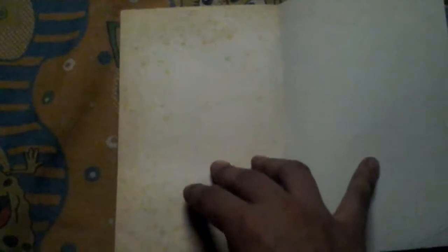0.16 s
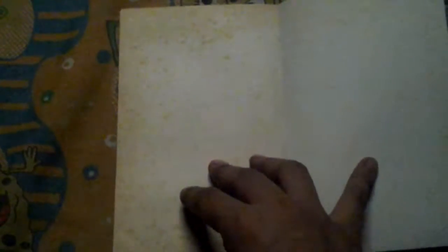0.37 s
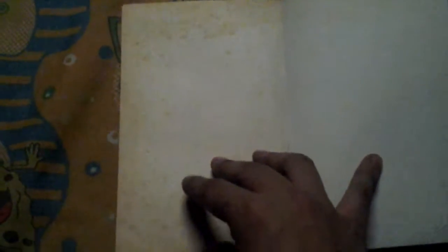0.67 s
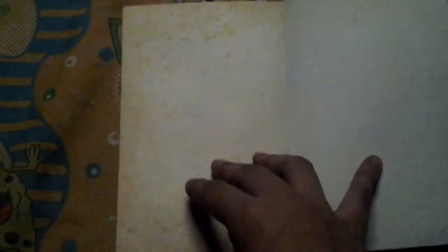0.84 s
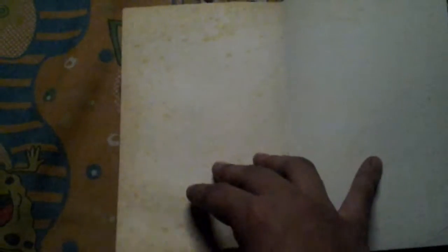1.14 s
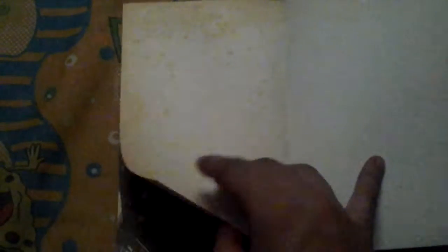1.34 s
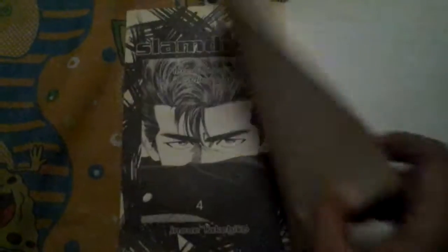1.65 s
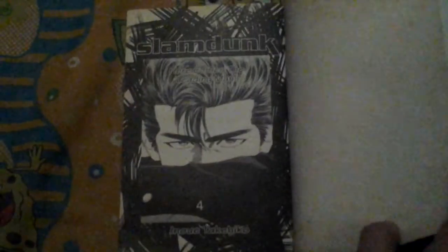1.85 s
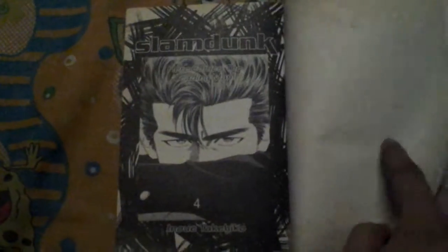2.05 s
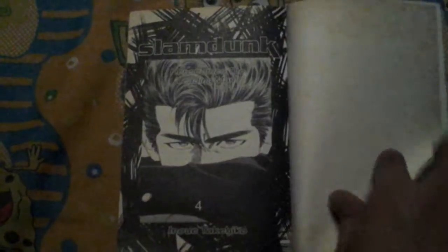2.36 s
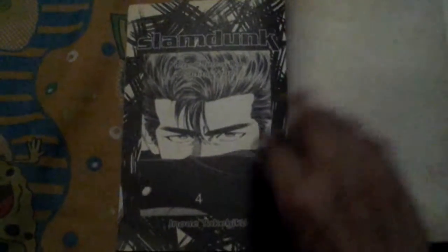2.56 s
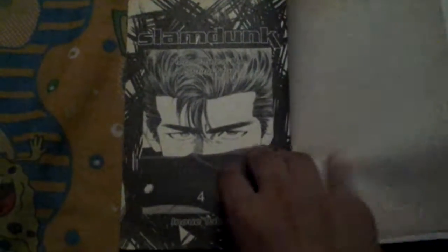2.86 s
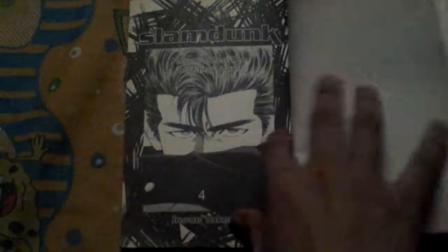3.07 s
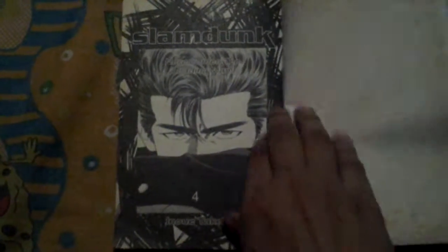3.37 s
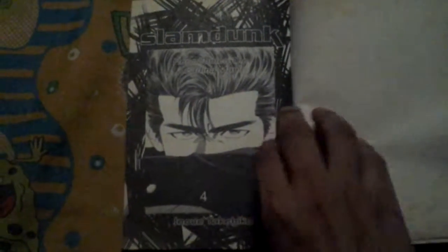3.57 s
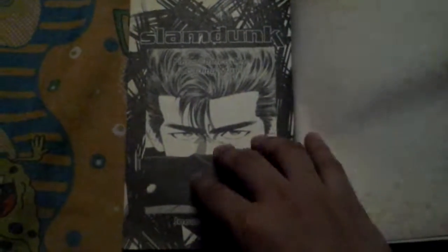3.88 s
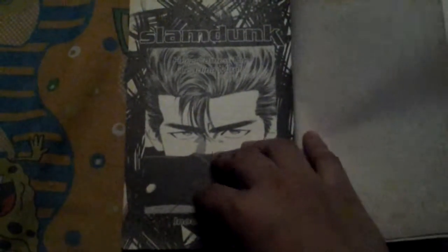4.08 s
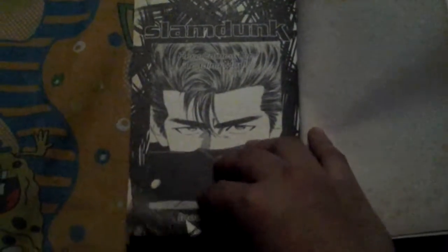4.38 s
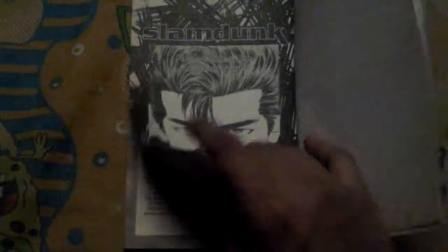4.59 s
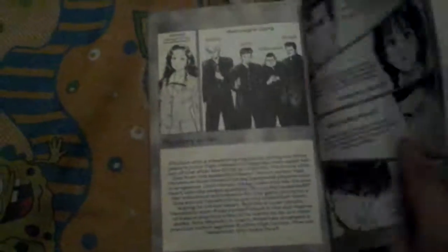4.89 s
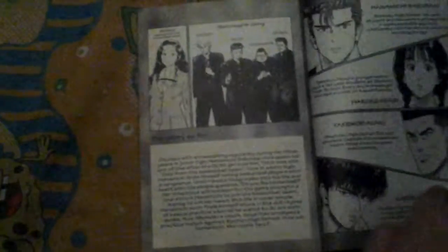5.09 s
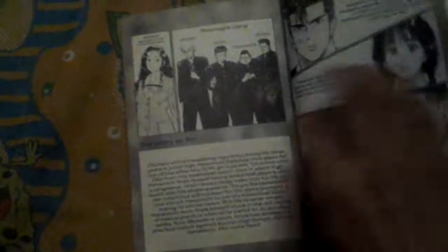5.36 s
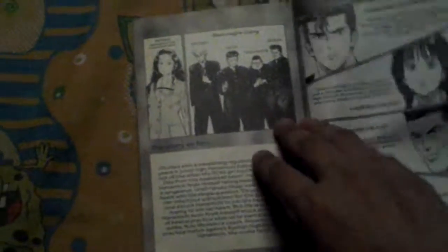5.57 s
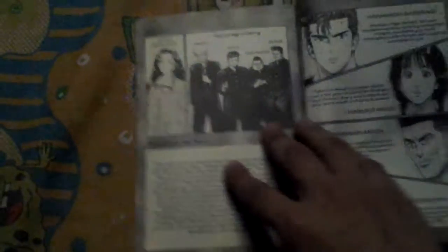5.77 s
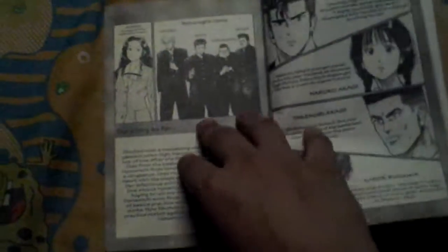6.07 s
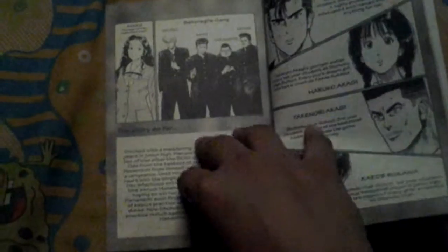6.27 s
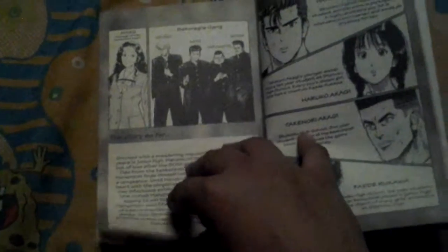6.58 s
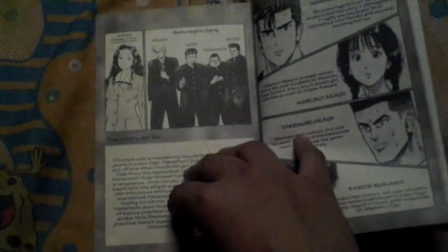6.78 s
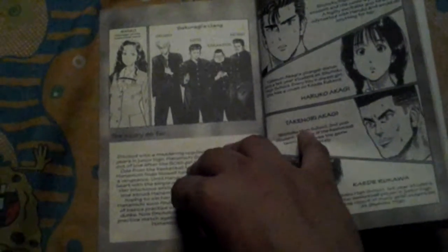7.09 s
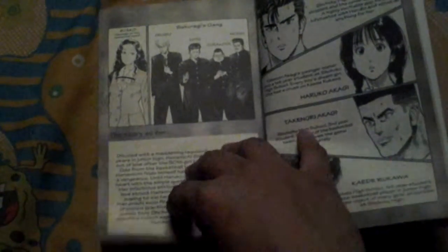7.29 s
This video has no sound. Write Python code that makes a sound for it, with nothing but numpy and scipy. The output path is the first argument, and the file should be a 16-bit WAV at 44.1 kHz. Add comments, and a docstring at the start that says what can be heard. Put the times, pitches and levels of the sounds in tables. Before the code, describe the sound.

Close, papery double slaps run steadily, then stop; a fingertip tap, a swish of page, a crisp snap and dull hand bumps follow over steady hiss.

```python
"""In a hissing room, close to a small microphone, dry paper flicks come about five a second for three seconds.
Each flick slides in, slaps twice and is followed by a soft return stroke: friction noise and crackle
under contact envelopes, partly filtered by the resonances of a hollow body.
Then a hand turns a paperback page and smooths it: faint rustle, air, snaps (one sharp), taps, dull bumps.
Behind lie filtered-noise rush, hiss and rumble, and a faint hum of wavering sines."""
import sys
import numpy as np
from scipy import signal
from scipy.fft import rfft, irfft
from scipy.io import wavfile
from scipy.ndimage import uniform_filter1d

SR = 44100
rng = np.random.default_rng(int(sys.argv[2]) if len(sys.argv) > 2 else 0)


def wav_record(signal):
    """Record a signal, one row per channel, as 16-bit PCM in the file named by sys.argv[1]."""
    frames = np.transpose(np.atleast_2d(signal))
    bounded = np.clip(frames, -1, 1)
    # unit amplitude maps onto the largest positive 16-bit level
    quanta = np.round(bounded * 32767).astype(np.int16)
    wavfile.write(sys.argv[1], SR, quanta)


N = 328104  # samples

# All levels are relative: later gains, filters and normalisation also act on them.

# resonances of the struck body: f/Hz, bandwidth/Hz, level/dB
BODY_MODES = [(340, 21, -2.5), (617, 93, -3), (930, 37, -12.5), (1276, 41, -0.5), (1979, 73, -5.5),
              (2320, 25, -8.5), (2833, 21, -11.5), (3010, 30, -11), (3190, 64, -10.5), (3525, 41, -6),
              (4200, 19, -11.5)]
# spectrum of the first, full knock: f/Hz, level/dB per Hz
KNOCK_SPECTRUM = [(150, -29), (320, 3.5), (650, -3.5), (900, 0), (1300, 9), (1650, -4), (2100, -3),
                  (3400, -7), (4700, -23), (5800, -17)]
# broad spectrum of the rubbing slaps: f/Hz, level/dB per Hz
SLAP_SPECTRUM = [(150, -11), (300, -4.5), (700, -3), (1300, 5), (1650, -6), (2100, -3), (3400, -3),
                 (4700, -7.5), (5800, -24), (7000, -14)]
# spectrum of the thump under a hard flick: f/Hz, level/dB per Hz
THUMP_SPECTRUM = [(20, 0), (45, -5), (70, 10), (110, -30), (200, -25)]
# spectrum of the crackle within a stroke, shared by the page's crinkles: f/Hz, level/dB per Hz
FLECK_SPECTRUM = [(1200, 5), (2400, 5.5), (3600, 1.5), (4700, 0), (5900, -18), (8500, -9.5), (13000, -18)]
# spectrum of the paper's sizzle, shared by the page: f/Hz, level/dB per Hz
SIZZLE_SPECTRUM = [(4500, -31), (6100, -5), (7000, -10.5), (7800, -4.5), (8600, 3.5), (10200, -0.5),
                   (11300, 2), (12400, -4), (14500, -8), (16000, -31)]
# narrow resonances within the sizzle: f/Hz, bandwidth/Hz, level/dB
SIZZLE_MODES = [(7380, 19, 7.5), (8070, 62, 5), (8430, 50, 3), (8720, 110, 8.5), (8800, 40, 2),
                (9570, 45, 8), (9530, 60, -4), (10200, 130, 8.5), (10370, 60, 1), (10820, 76, -6)]
# modulation spectrum of the fluttering sheet: f/Hz, level/dB per Hz
FLUTTER_SPECTRUM = [(40, 3), (160, -3), (400, -12)]
FLUTTER_DB = 1  # rms unevenness of every stroke
FLECKS_PER_S, FLECK_DB = 330, -8.5  # fibres let go one by one; level relative to the rub
SPARKS_PER_S, SPARK_DB = 800, -10.5  # the finest crackle; level relative to the sizzle


def flicks(knock_ring_db=-5.0, level_db=-0.5):
    """Contact noise: friction and crackle radiate directly and through body resonances."""
    knock, rub, sizzle = flick_forces()
    flutter = rms_one(from_db(FLUTTER_DB * noise(FLUTTER_SPECTRUM)))
    rub, sizzle = rub * flutter, sizzle * flutter

    body = from_db(-2.5) * knock * evened(noise(KNOCK_SPECTRUM))
    body += from_db(-2.5) * rub * noise(SLAP_SPECTRUM, grain_db=2.5)
    body += ringing(np.hypot(from_db(knock_ring_db) * knock, rub), BODY_MODES, vary_db=1.5)
    # grows as the square of the knock, so that hard flicks dominate
    thump = from_db(-33) * knock * (knock / knock.max()) * evened(noise(THUMP_SPECTRUM))
    flecks = from_db(FLECK_DB) * rub * crackle(FLECK_SPECTRUM, FLECKS_PER_S)

    surface = from_db(-7.0) * noise(SIZZLE_SPECTRUM, grain_db=2.0)
    surface += from_db(SPARK_DB) * crackle(SIZZLE_SPECTRUM, SPARKS_PER_S)
    surface_ring = from_db(-8.5) * ringing(sizzle, SIZZLE_MODES, vary_db=0.0)
    return from_db(level_db) * (body + thump + flecks + sizzle * surface + surface_ring)


# flicks: t/s, knock level/dB, sizzle level/dB, second slap level/dB, second slap delay/s, slide level/dB
FLICKS = [(0.033, -40, -24.5, -28, 0.024, -43), (0.311, -31, -27, -28, 0.032, -37),
          (0.604, -40, -22.5, -25.5, 0.026, -40.5), (0.802, -15, -16, -19, 0.02, -35),
          (1.005, -29, -23.5, -25, 0.03, -34.5), (1.215, -21, -22.5, -23.5, 0.024, -37.5),
          (1.425, -27, -23, -26, 0.022, -36), (1.637, -12.5, -17, -22.5, 0.023, -36.5),
          (1.817, -20, -22, -24, 0.025, -33.5), (2.03, -22.5, -20.5, -25, 0.025, -36.5),
          (2.222, -21.5, -20, -28.5, 0.023, -35), (2.423, -23, -21.5, -27, 0.026, -35),
          (2.615, -13, -19.5, -19.5, 0.022, -35.5), (2.801, -21.5, -21, -28.5, 0.029, -34)]
# the edge catches twice before it lets go: lead/s, level/dB relative to the slide
CATCHES = [(0.058, 1), (0.033, 0)]
# return strokes between the flicks: t/s, rub level/dB, sizzle level/dB
RETURNS = [(0.172, -34, -39), (0.46, -42, -44), (0.703, -32, -43), (0.89, -26.5, -46), (1.111, -30.5, -44),
           (1.307, -29.5, -43), (1.527, -33.5, -52), (1.726, -27, -44), (1.913, -31.5, -43),
           (2.124, -30, -46), (2.309, -29.5, -51), (2.519, -29.5, -40), (2.703, -25, -36),
           (2.914, -36, -44)]
SLIDE_LEAD_S, SLIDE_RISE_S, SLIDE_DECAY_S = 0.0042, 0.059, 0.019
CATCH_RISE_S, CATCH_DECAY_S = 0.0037, 0.0065
EDGE_RISE_S, EDGE_DECAY_S = 0.0028, 0.015  # the edge lets go abruptly
KNOCK_LAG_S, KNOCK_RISE_S, KNOCK_DECAY_S = 0.008, 0.0075, 0.0062
SECOND_RISE_S, SECOND_DECAY_S = 0.014, 0.022
RETURN_RISE_S, RETURN_DECAY_S = 0.0068, 0.025


def flick_forces(judder_db=3.5, second_rub_db=-3.0, edge_rub_db=-6.0, slide_rub_db=-2.5):
    """Stick-slip friction and impact: powers of successive contacts add; roots give the forces."""
    knock, rub, sizzle = np.zeros((3, N))
    judder = from_db(judder_db * noise([(15, 10), (60, -4), (140, -15)]))  # stick-slip
    for at, knock_db, sizzle_db, second_db, delay, slide_db in FLICKS:
        slide = burst(at - SLIDE_LEAD_S, SLIDE_RISE_S, SLIDE_DECAY_S)
        slide *= from_db(slide_db + 0.5) ** 2 * judder ** 2
        for lead, catch_db in CATCHES:
            slide += from_db(slide_db + catch_db) ** 2 * burst(at - lead, CATCH_RISE_S, CATCH_DECAY_S)
        edge = from_db(sizzle_db) ** 2 * burst(at, EDGE_RISE_S, EDGE_DECAY_S)
        second = from_db(second_db) ** 2 * burst(at + delay, SECOND_RISE_S, SECOND_DECAY_S)

        knock += from_db(knock_db) ** 2 * burst(at + KNOCK_LAG_S, KNOCK_RISE_S, KNOCK_DECAY_S)
        rub += from_db(slide_rub_db) ** 2 * slide
        rub += from_db(edge_rub_db) ** 2 * edge
        rub += from_db(second_rub_db) ** 2 * second
        sizzle += slide + edge + second
    for at, rub_db, sizzle_db in RETURNS:
        stroke = burst(at, RETURN_RISE_S, RETURN_DECAY_S)
        rub += from_db(rub_db) ** 2 * stroke
        sizzle += from_db(sizzle_db) ** 2 * stroke
    return np.sqrt(knock), np.sqrt(rub), np.sqrt(sizzle)


# snaps of the turning page: t/s, level/dB, brightness/dB
SNAPS = [(3.241, -31, -20), (5.0333, -16.5, -7), (5.040, -29, -10), (5.1423, -33, -17)]
# the sheet's brief modes after a snap: f/Hz, T60/s, level/dB
SHEET_MODES = [(3620, .009, -5), (4170, 0.0041, 4), (5200, 0.003, -16), (7700, .002, -19),
               (10500, 0.003, -12), (13000, .002, -16)]
# spectrum of a snap: f/Hz, level/dB per Hz
CRACK_SPECTRUM = [(2500, -17), (3700, 14), (4700, 1), (6000, -1), (7500, -2), (10000, -19)]
# spectrum of the page's scrape: f/Hz, level/dB per Hz
SCRAPE_SPECTRUM = [(2500, -24), (3700, 13), (4700, -8), (6000, -4), (8000, -22)]
# air pushed by the page as it is lifted and swung over: t/s, level/dB
SWINGS = [(4.385, -35), (4.745, -31)]
# spectrum of that air: f/Hz, level/dB per Hz
SWISH_SPECTRUM = [(500, -21), (800, 20), (1100, 16), (1500, 4), (2300, -16), (4000, -37)]
SWING_RISE_S, SWING_DECAY_S = 0.033, 0.037
CRINKLES_PER_S, CRINKLE_DB = 260, 2  # the bending page crinkles; level relative to the rustle force


def page_turn(snap_decay=0.003, tail_decay=0.014, tail_db=-10):
    """Buckling and friction: the sheet pushes air, slides with a fine crackle and snaps."""
    crack = noise(CRACK_SPECTRUM)
    sizzle = noise(SIZZLE_SPECTRUM, grain_db=2.0)
    crinkles = from_db(CRINKLE_DB) * crackle(FLECK_SPECTRUM, CRINKLES_PER_S)
    scrape = from_db(3.0) * noise(SCRAPE_SPECTRUM)
    out = rustle_force() * (from_db(2.3) * sizzle + scrape + crinkles)

    swing = sum(from_db(level_db) ** 2 * burst(at, SWING_RISE_S, SWING_DECAY_S) for at, level_db in SWINGS)
    out += np.sqrt(swing) * noise(SWISH_SPECTRUM)

    clicks = np.zeros(N)
    for at, level_db, bright_db in SNAPS:
        clicks[round(at * SR)] = from_db(level_db)
        power = burst(at, 0.00005, snap_decay)
        power += from_db(tail_db) ** 2 * burst(at, 0.0001, tail_decay)
        out += from_db(level_db - 12.5) * np.sqrt(power) * (crack + from_db(bright_db) * sizzle)
    return out + struck(clicks, SHEET_MODES)


# scuffs of the sliding page: t/s, level/dB
SCUFFS = [(4.785, -56), (4.857, -47.5), (4.94, -52), (4.988, -48), (5.135, -53), (5.27, -54), (5.305, -55)]
SCUFF_RISE_S, SCUFF_DECAY_S = 0.016, 0.013
PAGE_SLIDE_S, PAGE_SLIDE_DB, PAGE_SLIDE_RISE_S, PAGE_SLIDE_DECAY_S = 4.98, -55, 0.13, 0.07


def rustle_force():
    """Sliding friction: one slow swell, with brief scuffs where the page catches."""
    power = from_db(PAGE_SLIDE_DB) ** 2 * burst(PAGE_SLIDE_S, PAGE_SLIDE_RISE_S, PAGE_SLIDE_DECAY_S)
    for at, level_db in SCUFFS:
        power += from_db(level_db) ** 2 * burst(at, SCUFF_RISE_S, SCUFF_DECAY_S)
    return np.sqrt(power)


# fingertips landing on the book: t/s, level/dB
TAPS = [(4.2212, -13.5), (4.2363, -22)]
# heavily damped modes of the paper block: f/Hz, T60/s, level/dB
BLOCK_MODES = [(147, 0.05, -15), (290, 0.039, -1), (553, 0.009, -3)]


def taps(low_cut_hz=130):
    """Impulse response: a fingertip briefly rings the paper block, which radiates deep bass poorly."""
    clicks = np.zeros(N)
    for at, level_db in TAPS:
        clicks[round(at * SR)] = from_db(level_db)
    low_cut = signal.butter(2, low_cut_hz, "high", fs=SR, output="sos")
    return signal.sosfilt(low_cut, struck(clicks, BLOCK_MODES))


# bumps of the hand on the book: t/s, level/dB, decay/s, pitch ratio
BUMPS = [(0.352, -23.5, 0.015, 1.47), (0.604, -36.5, 0.018, 0.67), (4.47, -40.5, 0.037, 0.65),
         (5.5, -28.5, 0.04, 1.3), (5.82, -36, 0.089, 0.98), (6.335, -31, 0.023, 0.89),
         (6.64, -34, 0.053, 0.95)]
# spectrum of a bump at pitch ratio 1: f/Hz, level/dB per Hz
BUMP_SPECTRUM = [(40, -41), (90, -26), (150, -5), (270, 9), (450, -4.5), (900, -23), (2000, -45)]


def bumps():
    """Frequency scaling: dull noise, read faster or slower, gives each soft thud its own pitch."""
    out, dull, t = 0, evened(noise(BUMP_SPECTRUM)), clock()
    for at, level_db, decay, ratio in BUMPS:
        thud = np.interp(at + (t - at) * ratio, t, dull)
        out = out + from_db(level_db) * np.sqrt(burst(at, decay / 2, decay)) * thud
    return out


# low and middle part of the steady room rush: f/Hz, level/dB per Hz
RUSH_SPECTRUM = [(25, -46), (50, -46), (75, -30), (100, -38), (125, -26), (165, -17.5), (205, -12.5),
                 (265, -5.5), (330, -5.5), (400, 1.5), (455, -1.5), (535, 1.5), (700, -6.5), (910, -47)]
# upper part of the rush: f/Hz, level/dB per Hz
AIR_SPECTRUM = [(560, -38), (700, 1), (900, -0.5), (1100, 0.5), (1350, -2.5), (1600, -6), (1950, -8),
                (2350, -4.5), (2850, -13.5), (3400, -15.5), (4100, -22.5), (5000, -29), (5700, -49),
                (6500, -44)]
# microphone hiss: f/Hz, level/dB per Hz
HISS_SPECTRUM = [(5800, -7), (6600, -11.5), (7600, 1), (9000, 4.5), (11000, 3), (14500, -1.5), (16000, -18)]
# low rumble of slowly varying level, weaker during most of the flicks: t/s, level/dB
RUMBLE_LEVEL = [(0, -56), (0.6, -56), (1.3, -63), (2.0, -66), (3.0, -63), (4.0, -63), (4.45, -55.5),
                (5.0, -59.5), (5.8, -56.5), (6.3, -54), (6.8, -58.5), (7.4, -68)]
# spectrum of the rumble: f/Hz, level/dB per Hz
RUMBLE_SPECTRUM = [(25, -13), (50, -24), (75, -2), (100, -4.5), (125, 5.5), (165, 5.5), (260, -10)]


def room():
    """Stationary noise: rush and hiss, with a rumble of varying level and a faint hum."""
    rush = from_db(-32.5) * noise(RUSH_SPECTRUM)
    rush += from_db(-33) * noise(AIR_SPECTRUM, grain_db=1.5)
    hiss = from_db(-54.5) * noise(HISS_SPECTRUM)
    rumble_db = np.interp(clock(), *np.transpose(RUMBLE_LEVEL))
    return rush + hiss + from_db(rumble_db) * noise(RUMBLE_SPECTRUM) + hum()


# swells of the low hum: t/s, level/dB, rise/s
HUM_SWELLS = [(.9, -43.5, 0.093), (1.2, -45.5, 0.1), (1.56, -37.5, 0.053), (1.66, -38.5, 0.023),
              (2.02, -46.5, 0.11), (7.21, -35.5, 0.053)]
# gliding centre pitch of the hum: t/s, f/Hz
HUM_PITCH = [(0.8, 213), (1.25, 217), (1.48, 198), (1.57, 218), (1.68, 198), (1.9, 208), (2.15, 213),
             (7.15, 196), (7.4, 202)]
# a weaker tone beneath it
LOW_HUM_HZ, LOW_HUM_S, LOW_HUM_DB, LOW_HUM_RISE_S, LOW_HUM_DECAY_S = 174.4, 1.73, -50.5, 0.95, 0.75


def hum(release_ratio=1.85):
    """Amplitude and frequency modulation: a gliding tone swells over a weaker one without glide."""
    power = sum(from_db(level_db) ** 2 * burst(at, rise, rise * release_ratio)
                for at, level_db, rise in HUM_SWELLS)
    gliding = np.sqrt(power) * tone(np.interp(clock(), *np.transpose(HUM_PITCH)))
    low = from_db(LOW_HUM_DB) * np.sqrt(burst(LOW_HUM_S, LOW_HUM_RISE_S, LOW_HUM_DECAY_S))
    return gliding + low * tone(LOW_HUM_HZ)


def tone(hz, waver_hz=2.8):
    """Phase is the integral of frequency: a slightly wavering sine of rms 1."""
    waver = waver_hz * noise([(1, 5), (6, -19), (15, -20)])
    return np.sqrt(2) * np.sin(2 * np.pi * np.cumsum(hz + waver) / SR)


CONTACT_MOVES_PER_S = 12  # rate at which the contact's place on the body changes


def ringing(force, modes, vary_db=3.0):
    """Forced resonance: friction noise drives modes, unevenly as the contact moves; rms of the force."""
    drive, out = force * rng.standard_normal(N), 0
    for k, (hz, width_hz, level_db) in enumerate(modes):
        r = np.exp(-np.pi * width_hz / SR)  # pole radius
        poles = [1, -2 * r * np.cos(2 * np.pi * hz / SR), r * r]
        zeros = [(1 - r * r) / 2, 0, (r * r - 1) / 2]
        reached = drive * from_db(level_db + vary_db * wander(CONTACT_MOVES_PER_S))
        out = out + (-1) ** k * signal.lfilter(zeros, poles, reached)
    return rms_one(out) * np.sqrt(np.mean(force ** 2))


def struck(clicks, modes):
    """Free vibration: each click sets exponentially decaying sines ringing."""
    out = 0
    for k, (hz, t60, level_db) in enumerate(modes):
        r, w = from_db(-60 / (t60 * SR)), 2 * np.pi * hz / SR
        poles = [1, -2 * r * np.cos(w), r * r]
        mode = signal.lfilter([0, np.sin(w)], poles, clicks + 1e-18)
        out = out + (-1) ** k * from_db(level_db) * mode
    return out


def burst(at, rise, decay):
    """Exponential growth and decay of power about a moment; times are amplitude time constants."""
    power = np.zeros(N)
    near = np.arange(max(0, int((at - 10 * rise) * SR)), min(N, int((at + 10 * decay) * SR)))
    t = near / SR - at
    power[near] = np.exp(-2 * np.maximum(-t / rise, t / decay))
    return power + 1e-18


def crackle(spectrum, per_s):
    """Shot noise: equal clicks of random sign at random moments, filtered to rms 1."""
    signs = rng.choice([-1, 1], N)
    return coloured(signs * (rng.random(N) < per_s / SR), spectrum)


def noise(spectrum, grain_db=0):
    """Filtered Gaussian noise of rms 1; uneven levels of 24-sample grains roughen it."""
    grains = np.repeat(rng.standard_normal(N // 24 + 1), 24)[:N]
    return coloured(rng.standard_normal(N) * from_db(grain_db * grains), spectrum)


def coloured(drive, spectrum):
    """Linear filtering: shape a spectrum, falling away beyond both ends, at rms 1."""
    hz, level_db = np.transpose(spectrum)
    bins = np.arange(N // 2 + 1) * SR / N
    gain = from_db(np.interp(np.log(bins + 1), np.log(hz), level_db))
    gain *= np.minimum(1, (bins / hz[0]) ** 2)
    gain /= 1 + (bins / (2 * hz[-1])) ** 8
    return rms_one(irfft(rfft(drive) * gain, N))


def evened(x):
    """Short-time normalisation: hold a noise near rms 1, so that a blow has the strength it is given."""
    return x / np.sqrt(uniform_filter1d(x ** 2, size=400) + 1e-6)


def wander(per_s):
    """Random modulation: straight lines between Gaussian knots of standard deviation 1."""
    knots = rng.standard_normal(400)
    return np.interp(clock() * per_s, np.arange(len(knots)), knots)


def from_db(db):
    """Logarithmic level: decibels to amplitude gain."""
    return 10 ** (np.asarray(db) / 20)


def rms_one(x):
    """Mean-square normalisation: scale to rms 1."""
    return x / np.sqrt(np.mean(x ** 2) + 1e-20)


def clock():
    """Uniform sampling: time of every sample in seconds."""
    return np.arange(N) / SR


def scene():
    """Superposition: the pressures add at one microphone, which feeds both channels."""
    return np.tile(flicks() + page_turn() + taps() + bumps() + room(), (2, 1))


CUTOFF_HZ = 14600


def record(dry, notch_hz=6000, notch_q=9.1):
    """Band limiting: a narrow treble band around 6 kHz is hollowed out and the top is cut steeply."""
    notched = signal.lfilter(*signal.iirnotch(notch_hz, notch_q, fs=SR), dry)
    top_cut = signal.ellip(10, 0.2, 80, CUTOFF_HZ, fs=SR, output="sos")
    return signal.sosfilt(top_cut, notched)


dry = scene()
out = record(dry)
wav_record(out)
```